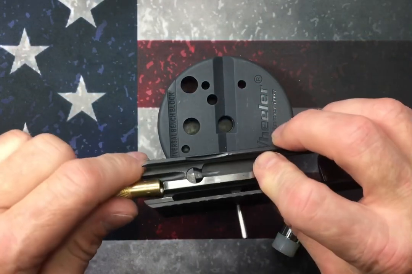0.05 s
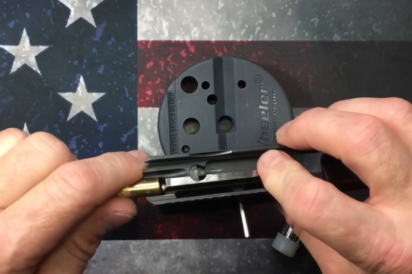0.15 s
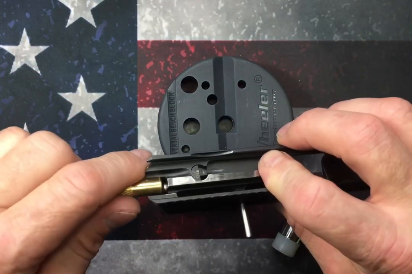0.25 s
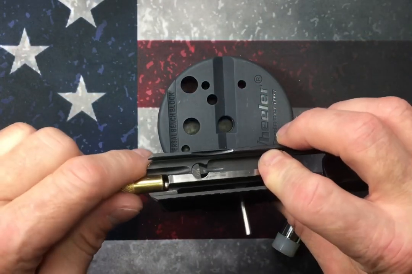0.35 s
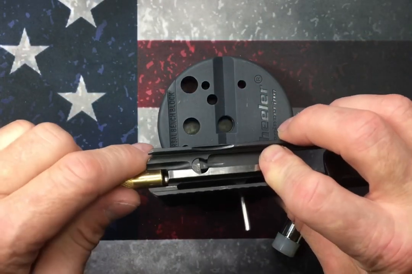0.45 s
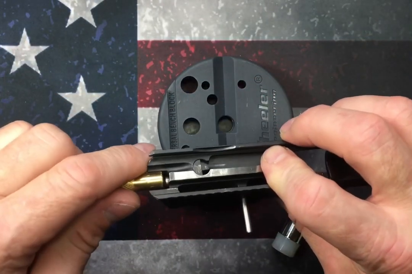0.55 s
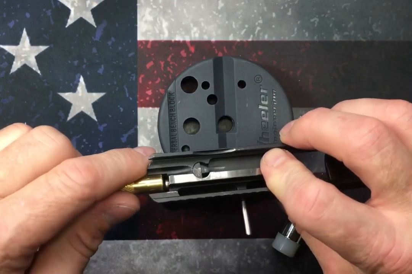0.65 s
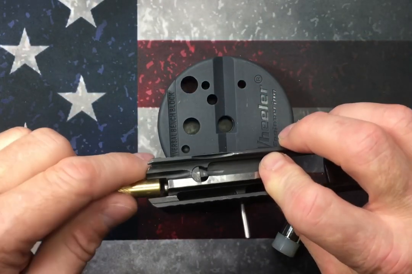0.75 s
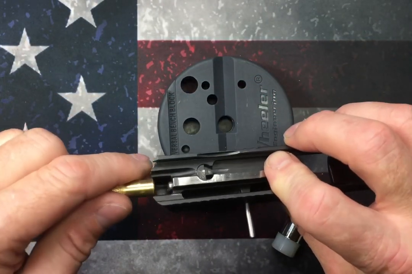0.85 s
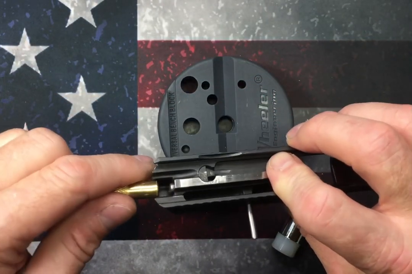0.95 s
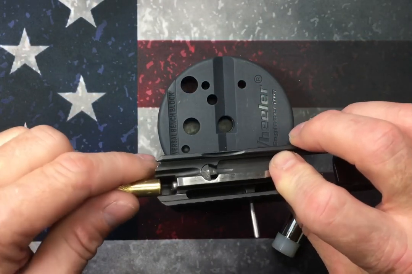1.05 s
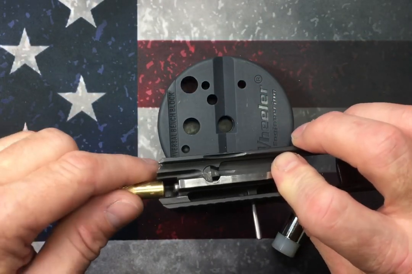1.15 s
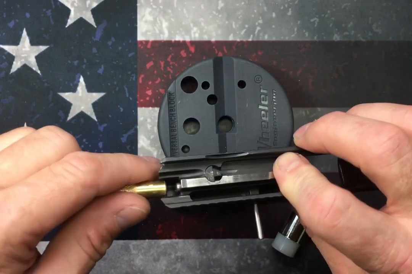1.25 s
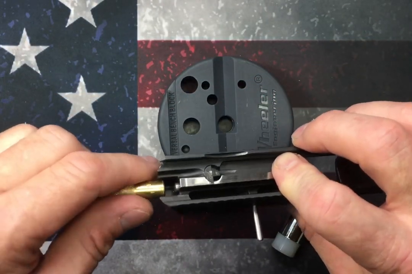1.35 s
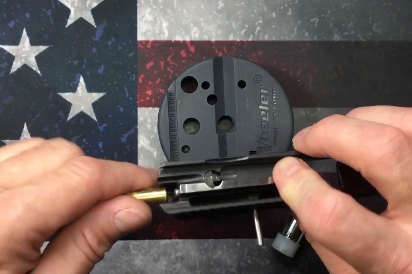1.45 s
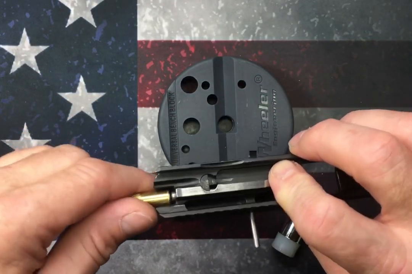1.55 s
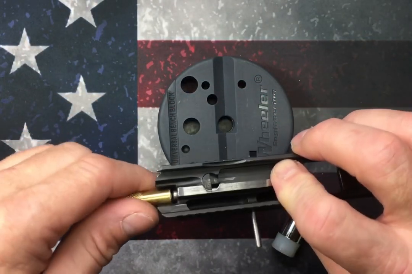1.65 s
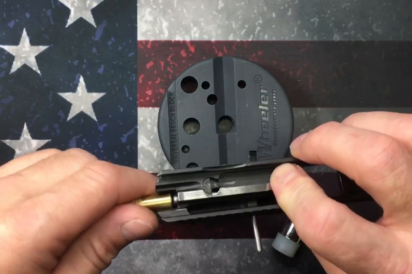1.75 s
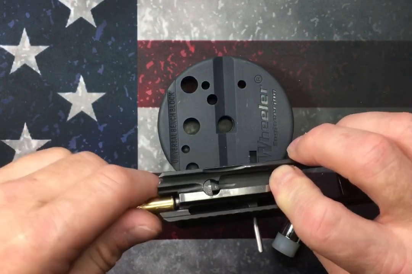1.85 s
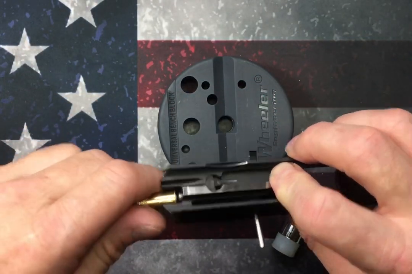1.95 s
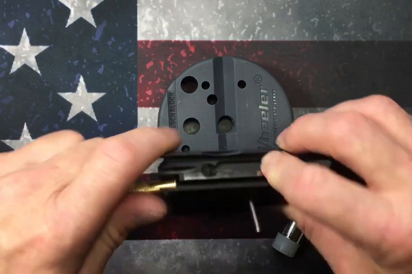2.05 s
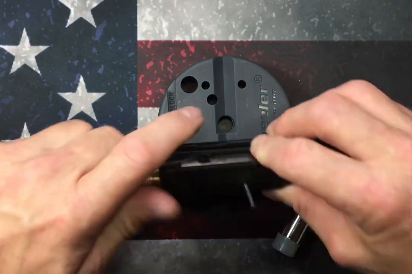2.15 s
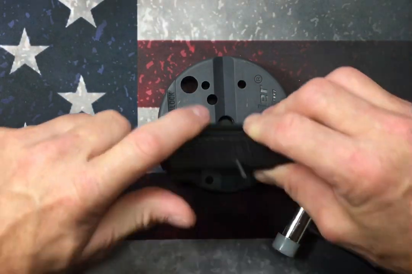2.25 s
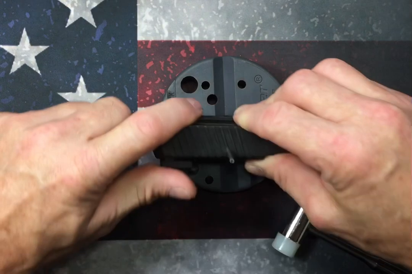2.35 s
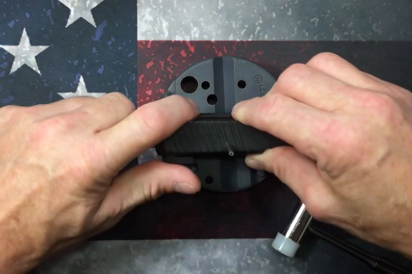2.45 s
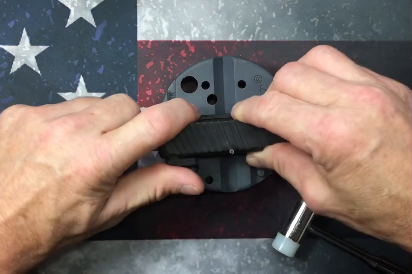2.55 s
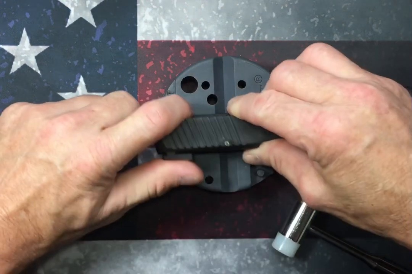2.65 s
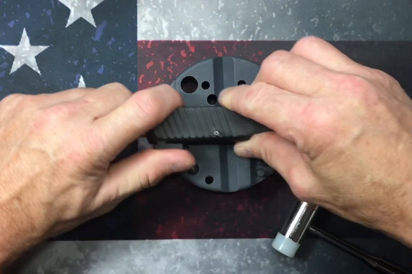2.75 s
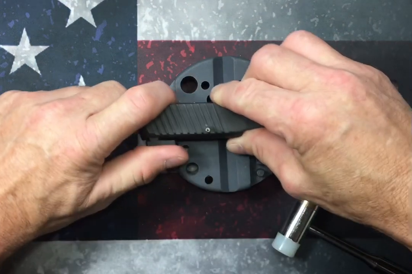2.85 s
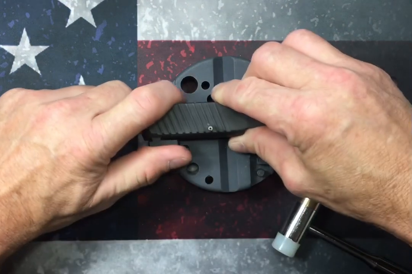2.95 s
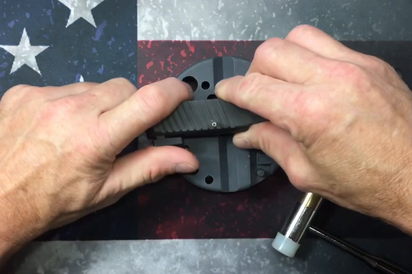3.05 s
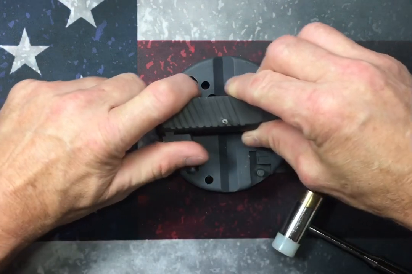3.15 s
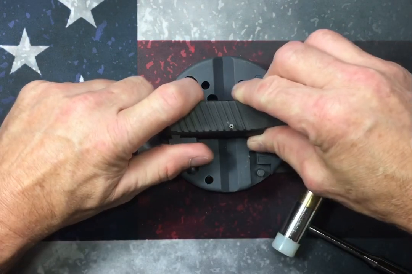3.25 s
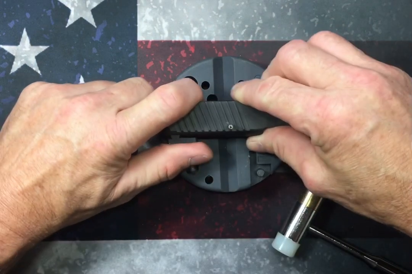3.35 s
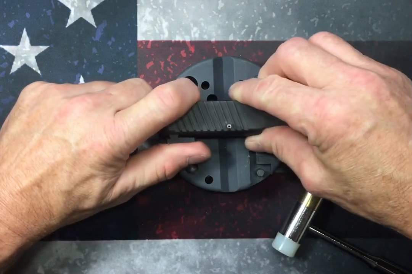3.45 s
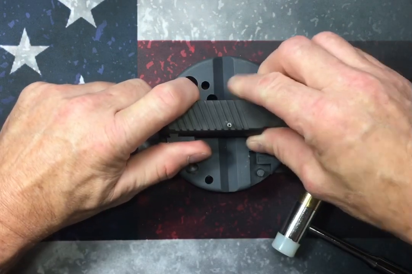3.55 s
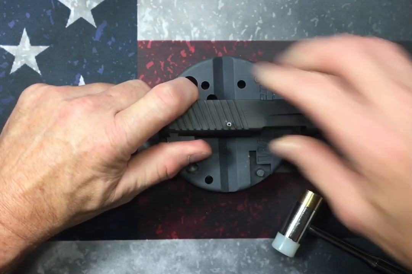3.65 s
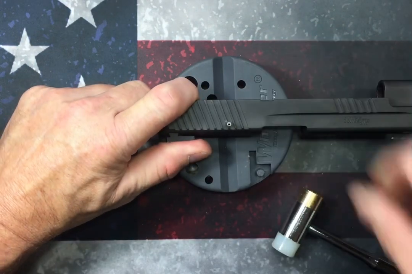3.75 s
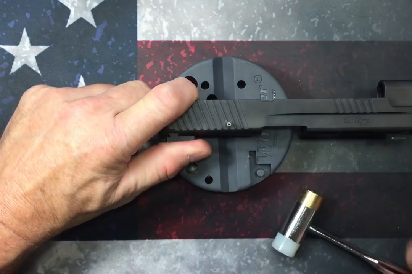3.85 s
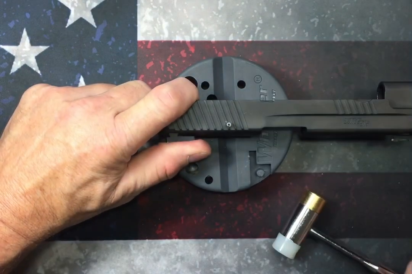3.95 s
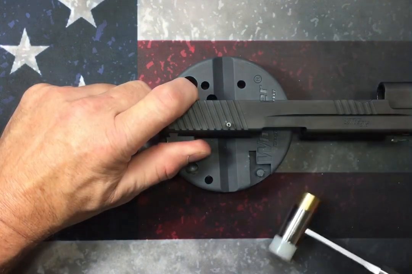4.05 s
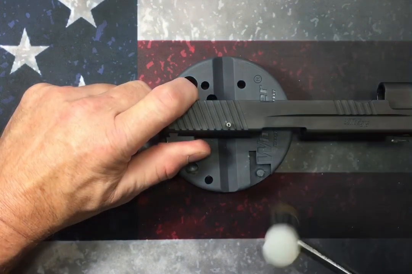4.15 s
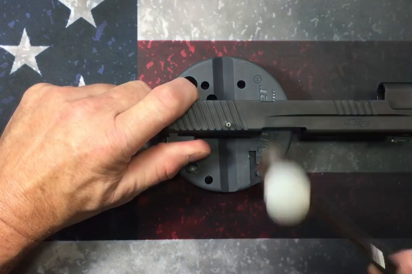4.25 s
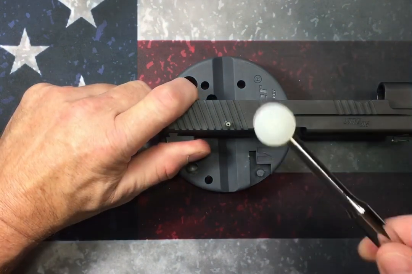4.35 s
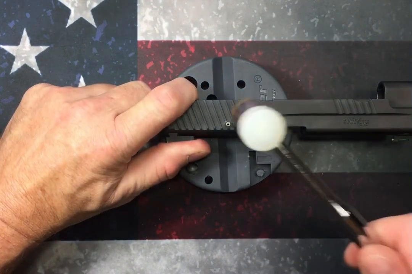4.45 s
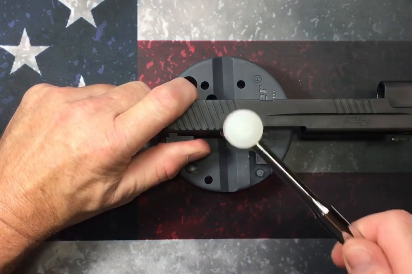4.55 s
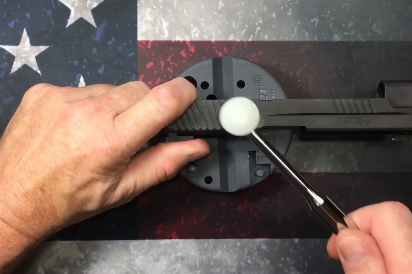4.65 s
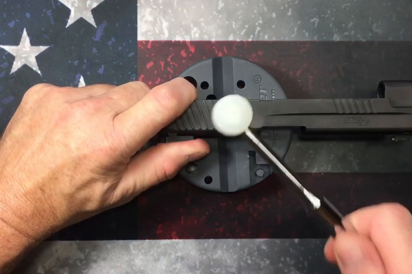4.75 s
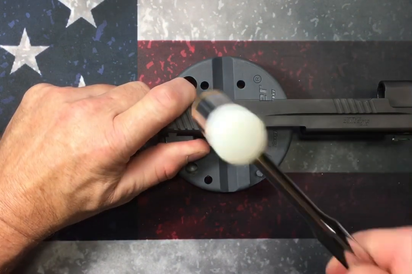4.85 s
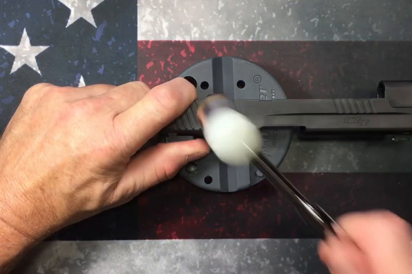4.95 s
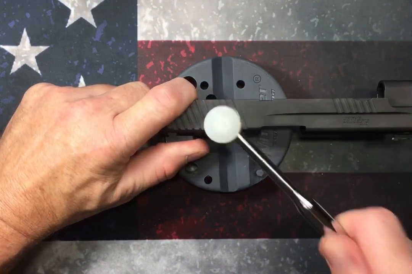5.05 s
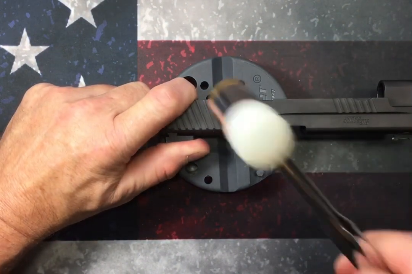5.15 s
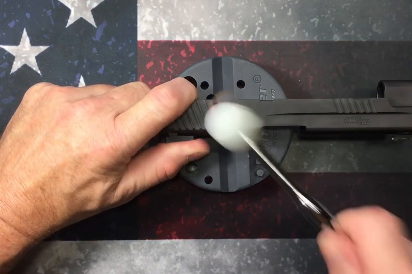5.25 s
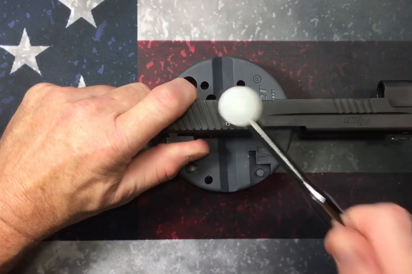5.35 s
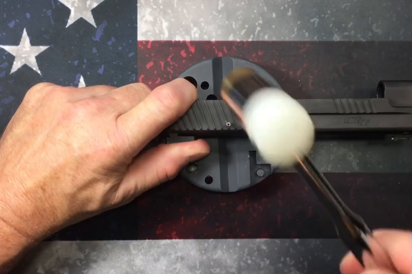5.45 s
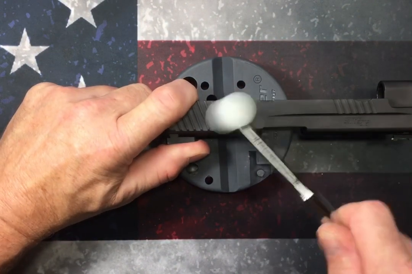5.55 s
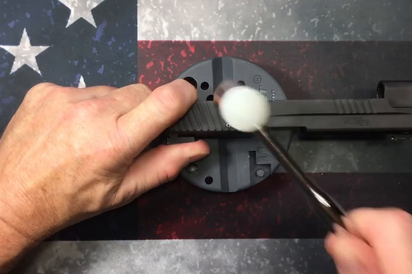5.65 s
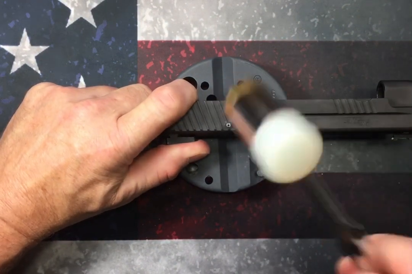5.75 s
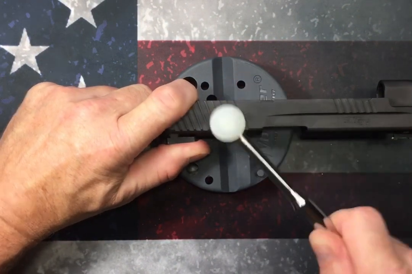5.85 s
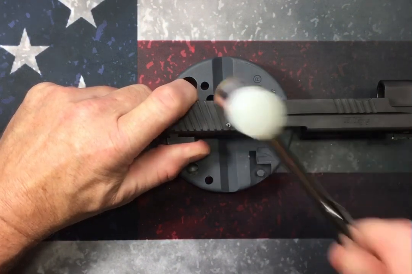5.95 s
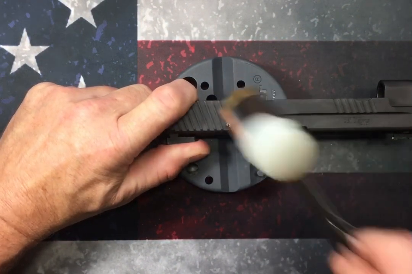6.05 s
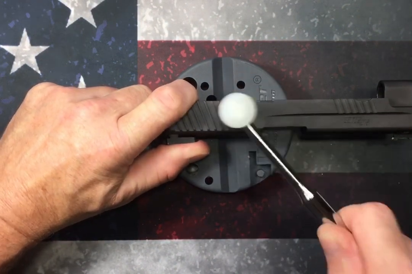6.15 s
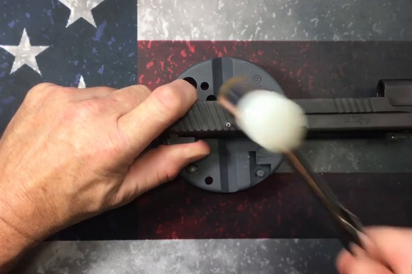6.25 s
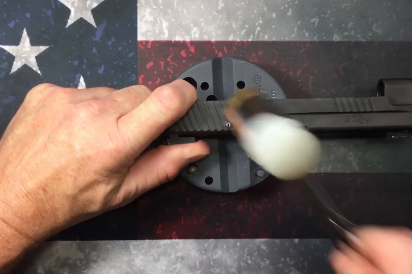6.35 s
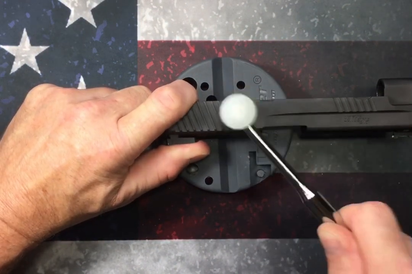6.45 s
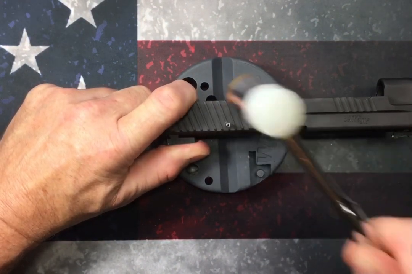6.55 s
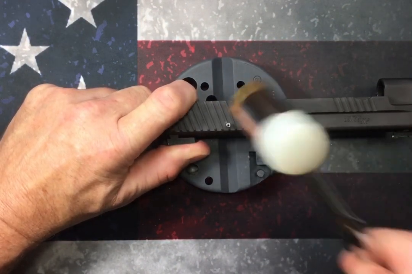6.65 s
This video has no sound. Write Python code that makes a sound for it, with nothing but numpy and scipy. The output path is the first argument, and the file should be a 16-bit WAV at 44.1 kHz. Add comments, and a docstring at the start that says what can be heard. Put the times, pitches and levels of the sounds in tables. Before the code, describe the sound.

Small metallic clicks and faint finger squeaks, a dull plastic knock, then six sharp, even hammer taps on ringing steel in a quiet room.

```python
"""A low hum and room hiss run throughout over a distant rumble; fingers click, squeak and brush a steel part.
From 1.1 s a distant motor gathers speed and levels off, its overtones swept through resonances; a whirr swells later.
The part drops into a plastic bench block (struck modes); a small hammer slides over a mat and bumps (resonant noise).
From 5.1 s six even hammer taps drive a pin: noise cracks and clatters, modes ring the steel and thump the bench.
A diffuse tail and echoes answer the near sounds; the close microphone squashes the loudest swings."""
import sys
import numpy as np
from scipy import signal
from scipy.fft import rfft, irfft
from scipy.io import wavfile

SR = 44100
rng = np.random.default_rng(int(sys.argv[2]) if len(sys.argv) > 2 else 0)


def transcribe(u):
    """Save the signal u as a 16-bit wav file named by the first command-line argument.

    u: samples, shape (n,) or (channels, n), limited to [-1, 1]; the rate is SR.
    q: integer samples, one column per channel.
    """
    v = np.clip(np.atleast_2d(u).T, -1, 1)
    q = np.round(v * 32767).astype(np.int16)
    wavfile.write(sys.argv[1], SR, q)


N = 295029

# hammer taps: (time [s], force [dB], bench sway [dB], ring [dB re RING_REF_DB], main ring pitch [Hz])
TAPS = [(5.1127, -4.5, -31, 6, 3906), (5.3954, -1.5, -20.5, 0, 3990), (5.6718, 1, -10, -4.5, 3970),
        (5.948, 3.5, -11, -4.5, 3916), (6.2260, 2, -6, -1.5, 3990), (6.5252, 3, -17.5, 1.5, 3940)]
# fixed modes of the struck steel, from 1.2 to 15.5 kHz: (frequency [Hz], relative level [dB], t60 [s])
STEEL_MODES = [(1219, -26, 0.037), (1605, -19, 0.032), (1870, -12.5, 0.013), (2103, -19, 0.02),
               (2790, -21, 0.04), (4470, -28.5, .03), (6400, -40.5, .14), (7950, -32, 0.15),
               (9450, -35, 0.1), (11400, -41.5, .1), (12080, -22.5, 0.079), (12370, -26, 0.059),
               (15500, -23.5, 0.038)]
# bending modes of the steel: (ratio to main ring [1], relative level [dB], t60 [s])
BENDING_MODES = [(.578, -11, 0.21), (.6, -0.5, 0.12), (1, 1.5, .14), (1.012, 1, 0.093)]
# bench top modes: (frequency [Hz], signed relative height [1], t60 [s])
BENCH_MODES = [(131.2, -0.55, 0.064), (165.2, 0.62, 0.058), (231, 0.066, 0.21), (277, 0.87, 0.016),
               (341.2, -0.34, 0.074), (414, -0.28, 0.053), (602.5, -0.093, 0.076), (734, 0.41, 0.018),
               (884.6, -0.075, 0.069)]
# contact crack spectrum: (frequency [Hz], relative density [dB per Hz])
CRACK_SPECTRUM = [(400, 2), (1000, 3.5), (1700, 2), (3000, 2), (4300, 0), (5500, -11.5), (8500, -6.5),
                  (12000, -3), (15500, 3.5), (17000, -23)]
# clatter of part and block, spectrum: (frequency [Hz], relative density [dB per Hz])
CLATTER_SPECTRUM = [(400, -4), (800, 4), (1150, -0.5), (1700, 1), (2300, 3.5), (3100, -3), (4200, -5),
                    (5500, -7), (10000, -8), (14500, -8.5), (17000, -23)]
# steel clicks in the hands: (time [s], body level [dB], level of the snap [dB])
CLICKS = [(.0349, -56, -55), (.1212, -36, -36), (.2355, -35.5, -47), (.3218, -60, -73), (.8675, -62, -73),
          (.9459, -57, -72), (1.5659, -38, -41), (1.6153, -45, -54), (1.6240, -48, -50), (1.6577, -48, -48),
          (2.1586, -38, -36), (2.7677, -65, -69)]
# resonances of the held part: (frequency [Hz], width [Hz], relative level [dB])
HELD_MODES = [(1670, 130, -1), (2280, 240, 2), (2650, 300, -5), (3880, 240, -3), (4800, 260, -5),
              (7200, 400, -9), (9140, 300, -13)]
# snap of steel edges, spectrum: (frequency [Hz], relative density [dB per Hz])
SNAP_SPECTRUM = [(300, -37), (1200, -16), (3500, 6), (5000, 3.5), (6400, 2), (7300, 5.5), (9300, 1),
                 (10300, -13), (15500, -30)]
# fingers squeaking on and brushing the steel: (time of peak [s], peak level [dB], frequency [Hz], width [Hz])
FINGER_RUBS = [(.215, -56, 2200, 600), (.29, -63, 2400, 200), (.952, -57, 2300, 110),
               (1.585, -56, 1950, 500), (1.625, -55, 1950, 500), (2.135, -70, 13000, 4500),
               (2.68, -69, 3900, 250)]
# part drops into its seat: (time [s], level [dB])
SEATING = [(3.386, -31.5)]
# modes of the seated block: (frequency [Hz], relative level [dB], t60 [s])
BLOCK_MODES = [(138, 3, 0.13), (327, -8, 0.056), (420, -0.5, 0.049), (553, -3.5, 0.072), (660, -2.5, 0.041),
               (1004, -16, 0.043), (1250, -10.5, 0.013), (2244, -12.5, 0.046), (2680, -19.5, 0.021)]
# hammer slides over the mat: (time [s], level [dB])
SLIDE_LEVEL = [(3.661, -79), (3.74, -79), (3.78, -64), (3.84, -66), (3.92, -75), (3.96, -81)]
# hammer resonances: (frequency [Hz], width [Hz], relative level [dB])
HAMMER_MODES = [(1034, 240, 4.5), (1205, 160, 12), (1680, 160, 13.5), (2020, 310, 9.5), (2620, 1000, -7)]
# hammer bumps as it is picked up: (time [s], level [dB])
BUMPS = [(3.966, -60.5), (3.993, -46), (4.0060, -53), (4.1512, -59.5)]
# room build-up: (frequency [Hz], rise time [s])
ROOM_RISE = [(200, .11), (400, .015), (2500, .015), (5000, .055)]
# room decay: (frequency [Hz], t60 [s])
ROOM_T60 = [(100, .5), (250, .5), (800, .38), (2300, .33), (3200, .29), (5000, .29), (9000, .265),
            (14000, .235)]
# room colour: (frequency [Hz], level re wet level [dB])
ROOM_COLOUR = [(50, -7), (110, -4.5), (160, -5), (225, 3.5), (300, 0), (400, 0), (500, 3.5), (750, 2),
               (1150, 4), (1700, -1.5), (2300, .5), (3200, 4), (6000, 1), (14000, .5)]
# wall echoes: (delay [s], level [dB])
ECHOES = [(0.03, -26), (0.0554, -19.5), (0.0866, -23.5), (.1135, -30), (.143, -36.5)]
# motor drone: (time [s], level before FIRING_DB [dB])
MOTOR_LEVEL = [(1.2, -59.5), (1.5, -55.5), (1.78, -54), (2.29, -49), (3.14, -53), (3.38, -52.5),
               (4.15, -58.5), (4.44, -51), (4.77, -64), (5.0, -71)]
# motor throb at twice the turning rate: (time [s], level [dB])
THROB_LEVEL = [(1.2, -67), (1.68, -54.5), (3.23, -62), (3.38, -53.5), (4.09, -46.5), (4.96, -77),
               (5.0, -67)]
# resonances met by the motor overtones: (frequency [Hz], width [Hz], level re firing tone [dB])
BOOMS = [(143, 6.5, -13.5), (164.5, 12.3, -2.5), (198, 10, -8.5), (257.3, 10, -18), (282.5, 7.8, -10.5),
         (313.7, 12, -21), (344, 8.5, -22.5)]
# distant rumble contour, before shift and scaling: (time [s], level [dB])
RUMBLE_CONTOUR = [(0.0, -83.5), (1.11, -82), (1.57, -73.5), (1.91, -76), (2.18, -69), (2.43, -72),
                  (2.78, -67.5), (5.05, -75.5)]
# rumble spectrum: (frequency [Hz], relative density [dB per Hz])
RUMBLE_SPECTRUM = [(60, -13), (90, 12.5), (180, -4.5), (230, -9), (320, -2), (400, -4), (600, -3.5),
                   (760, -18), (930, -10.5), (1300, -28.5), (2500, -40)]
# steady hum: (frequency [Hz], level [dB])
HUM_TONES = [(58.3, -49.5), (87.4, -62), (175, -79.5)]
# room hiss spectrum: (frequency [Hz], relative density [dB per Hz])
HISS_SPECTRUM = [(30, 5.5), (70, 21.5), (120, 10), (250, -1.5), (500, -11), (1000, -11.5), (2500, -13.5),
                 (7000, -20.5), (12000, -24.5), (16000, -26.5)]

# levels at a force of 0 dB, and their change in dB per dB of force
CRACK_DB, STRIKE_DB, TREBLE_DB = -6, 0.25, -3.07
CRACK_GROWTH, STRIKE_GROWTH, DULLING = 0.85, 0.45, 1.1
CLATTER_REL_DB, RING_REF_DB = -20, -28
THUMP_DELAY_S = 0.001966
CLICK_T60_S, RUB_SWELL_S = 0.013, 0.014
MOTOR_START_S, MOTOR_ATTACK_S, RUN_UP_S = 1.1, 0.099, 0.62
START_TURNS_PER_S, TOP_TURNS_PER_S, FIRING_DB = 31.0, 35.7, 1.5
WHIRR_PEAK_S, WHIRR_DB, WHIRR_FADE_DB_PER_S = 4.8, -55.5, 13.5
WHIRR_PEAK_HZ, WHIRR_RISE_HZ_PER_S = 308.5, 12
RUMBLE_TOP_DB, RUMBLE_SWING = -60, 1.2  # top of the contour before random drift; contour scale
DIP_S, DIP_DB, DIP_WIDTH_S = 0.935, 9, 0.025
CUTOFF_HZ = 15900


def hammer():
    """Crack, clatter and delayed thump (block gives way) follow force; ring and sway are given for each tap."""
    out = np.zeros(N)
    for s, force_db, sway_db, ring_db, ring_hz in TAPS:
        add(out, s, steel_strike(force_db))
        add(out, s, from_db(ring_db + RING_REF_DB) * bending_ring(ring_hz))
        sway = from_db(sway_db) * ring(hz=66, t60_s=0.072)  # whole bench pushed down
        add(out, s + THUMP_DELAY_S, from_db(force_db) * bench_thump() - sway)
    return out


def steel_strike(force_db):
    """Contact noise plus fixed steel modes; a firmer tap has more crack and less treble."""
    crack_db = CRACK_DB + CRACK_GROWTH * force_db
    crack = from_db(crack_db) * noise(CRACK_SPECTRUM, SR // 2) * fade(0.014)
    clatter = from_db(CLATTER_REL_DB) * noise(CLATTER_SPECTRUM, SR // 2) * fade(0.1)
    detune = rng.normal(1, 0.0012, len(STEEL_MODES))
    steel = 0
    for k, (hz, db, t60_s) in enumerate(STEEL_MODES):
        gain = from_db(db + rng.standard_normal())
        steel = steel + (-1) ** k * gain * ring(hz * detune[k], t60_s)
    strike = crack + from_db(STRIKE_DB + STRIKE_GROWTH * force_db) * (clatter + steel)
    return shelve_treble(strike, TREBLE_DB - DULLING * force_db, corner_hz=5100)


def bending_ring(main_hz):
    """Bending modes of the steel, all shifting together with the main ring."""
    return sum(from_db(db) * ring(ratio * main_hz, t60_s) for ratio, db, t60_s in BENDING_MODES)


def bench_thump():
    """Low bench modes; random strengths and shifts stand for the holding hand's pressure."""
    strength = from_db(rng.normal(0, 0.8, len(BENCH_MODES)))
    detune = rng.normal(1, 0.012, len(BENCH_MODES))
    thump = 0
    for (hz, height, t60_s), gain, shift in zip(BENCH_MODES, strength, detune):
        thump = thump + height * gain * ring(hz * shift, t60_s)
    return thump


def handling():
    """Part and hammer are moved by hand."""
    return clicks() + finger_rubs() + seating() + hammer_bumps() + hammer_slide()


def clicks():
    """Body resonances damped by the hand, plus a snap of steel edges."""
    out = np.zeros(N)
    for s, body_db, snap_db in CLICKS:
        damped = fade(CLICK_T60_S) + from_db(-11) * fade(0.097)
        body = resonant_noise(HELD_MODES, SR // 2) * damped
        snap = noise(SNAP_SPECTRUM, SR // 2) * fade(CLICK_T60_S)
        add(out, s, from_db(body_db) * body + from_db(snap_db) * snap)
    return out


def finger_rubs():
    """Squeaks and a brush of fingers: noise bands swelling as pressure builds and eases."""
    out = np.zeros(N)
    for s, db, hz, width_hz in FINGER_RUBS:
        swell = np.exp(-0.5 * (age_s() / RUB_SWELL_S - np.pi) ** 2)
        friction = resonant_noise([(hz, width_hz, 0)], SR // 2)
        add(out, s - np.pi * RUB_SWELL_S, from_db(db) * swell * friction)
    return out


def seating():
    """Dull knock: block modes excited through a soft plastic contact."""
    out = np.zeros(N)
    for s, db in SEATING:
        knock = 0
        for k, (hz, mode_db, t60_s) in enumerate(BLOCK_MODES):
            knock = knock + (-1) ** k * from_db(db + mode_db) * ring(hz, t60_s)
        add(out, s, knock * np.minimum(age_s() / 0.00072, 1))
    return out


def hammer_bumps():
    """Decaying noise through the hammer resonances."""
    out = np.zeros(N)
    for s, db in BUMPS:
        add(out, s, from_db(db) * resonant_noise(HAMMER_MODES, SR // 2) * fade(0.067))
    return out


def hammer_slide():
    """Friction through the hammer resonances; random level changes as it sticks and slips."""
    level_db, = in_time(SLIDE_LEVEL)
    start_s, end_s = SLIDE_LEVEL[0][0], SLIDE_LEVEL[-1][0]
    sliding = (clock_s() > start_s) & (clock_s() < end_s)
    return sliding * from_db(level_db + 3.7 * waver(120)) * resonant_noise(HAMMER_MODES, N)


def room(x, wet_db, echo_hz):
    """A diffuse tail that dies sooner in the treble, plus dull wall echoes."""
    edges_hz, tail = np.geomspace(40, 17000, 24), 0
    for low, high in zip(edges_hz, edges_hz[1:]):
        bandpass = signal.butter(2, [low, high], "band", fs=SR, output="sos")
        band = signal.sosfilt(bandpass, rng.standard_normal(SR))[-(SR // 2):]
        hz = np.sqrt(low * high)
        build_up = np.clip(age_s() / max(at_hz(ROOM_RISE, hz), 1e-3), 0, 1) ** 2  # reflections thicken
        shape = build_up * fade(at_hz(ROOM_T60, hz))
        power = np.mean(shape ** 2) * (high - low) / (SR / 2)  # share by bandwidth
        gain = from_db(wet_db + at_hz(ROOM_COLOUR, hz)) * np.sqrt(power)
        tail = tail + gain * rms_one(band * shape)
    out = signal.fftconvolve(x, tail)[:N]
    dull = signal.sosfilt(signal.butter(1, echo_hz, fs=SR, output="sos"), x)
    for s, db in ECHOES:
        add(out, s, from_db(db) * dull)
    return out


def background():
    """Distant machine sounds, hum and room hiss."""
    hiss = from_db(-64) * noise(HISS_SPECTRUM, N)
    return motor() + whirr() + rumble() + hum() + hiss


def motor():
    """Firing tone, low throb, and overtones that swell as speed carries them through resonances."""
    since_start_s = np.maximum(clock_s() - MOTOR_START_S, 0)
    speed_gap = (TOP_TURNS_PER_S - START_TURNS_PER_S) * np.exp(-since_start_s / RUN_UP_S)
    turns_per_s = TOP_TURNS_PER_S - speed_gap
    level_db, = in_time(MOTOR_LEVEL)
    throb_db, = in_time(THROB_LEVEL)
    overtones = 0
    for order in range(4, 11):
        hz = order * turns_per_s
        gain = sum(from_db(db) / (1 + (2 * (hz - boom_hz) / width_hz) ** 2)
                   for boom_hz, width_hz, db in BOOMS)
        overtones = overtones + gain * wavering_tone(hz, rate_hz=4)
    firing = from_db(0.8 * waver(7.4)) * tone(3 * turns_per_s)
    drone = from_db(level_db + FIRING_DB) * (firing + overtones)
    throb = from_db(throb_db) * tone(2 * turns_per_s)
    return np.minimum(since_start_s / MOTOR_ATTACK_S, 1) * (drone + throb)


def whirr():
    """A rough tone, rising slowly in pitch, swells to a peak and fades at the same rate."""
    since_peak_s = clock_s() - WHIRR_PEAK_S
    hz = WHIRR_PEAK_HZ + WHIRR_RISE_HZ_PER_S * since_peak_s
    level_db = WHIRR_DB - WHIRR_FADE_DB_PER_S * abs(since_peak_s)
    return from_db(level_db) * (from_db(-4.5) * tone(hz) + wavering_tone(hz, rate_hz=85))


def rumble():
    """Low noise following a scaled contour with slow random drift."""
    contour_db, = in_time(RUMBLE_CONTOUR)
    level_db = RUMBLE_TOP_DB + RUMBLE_SWING * (contour_db - contour_db.max())
    return from_db(level_db + 1.6 * waver(10)) * noise(RUMBLE_SPECTRUM, N)


def hum():
    """Steady low tones with one brief dip."""
    dip = np.exp(-0.5 * ((clock_s() - DIP_S) / DIP_WIDTH_S) ** 2)
    return from_db(-DIP_DB * dip) * sum(from_db(db) * tone(hz) for hz, db in HUM_TONES)


def from_db(db):
    """Decibels to gain."""
    return 10 ** (np.asarray(db) / 20)


def rms_one(x):
    """Scale to unit power."""
    return x / np.sqrt(np.mean(x ** 2) + 1e-20)


def clock_s():
    """Time of every sample."""
    return np.arange(N) / SR


def age_s():
    """Time since a blow, over half a second."""
    return np.arange(SR // 2) / SR


def in_time(rows):
    """Each column of a curve at every sample."""
    s, *columns = np.transpose(rows)
    return [np.interp(clock_s(), s, column) for column in columns]


def at_hz(points, hz):
    """Read a spectrum on a log-frequency axis."""
    point_hz, values = np.transpose(points)
    return np.interp(np.log(hz + 1e-9), np.log(point_hz), values)


def noise(spectrum, size):
    """Noise of a given colour, rms 1."""
    gain = from_db(at_hz(spectrum, np.fft.rfftfreq(size, 1 / SR)))
    return rms_one(irfft(rfft(rng.standard_normal(size)) * gain, size))


def resonant_noise(modes, size):
    """Noise through parallel resonances with steep skirts, rms 1."""
    white, out = rng.standard_normal(size), 0
    for hz, width_hz, db in modes:
        b, a = signal.iirpeak(hz, hz / (1.5 * width_hz), fs=SR)  # widened, as two passes narrow it
        once = signal.lfilter(b, a, white)
        out = out + from_db(db) * signal.lfilter(b, a, once)
    return rms_one(out)


def fade(t60_s):
    """Exponential decay from height 1."""
    return np.exp(-np.log(1000) * age_s() / max(t60_s, 1e-3))


def ring(hz, t60_s):
    """One struck mode: a decaying sine."""
    return np.sin(2 * np.pi * hz * age_s()) * fade(t60_s)


def waver(rate_hz):
    """Random movement: lines between normal knots of spread 1, rate_hz knots per second."""
    knots = rng.standard_normal(N // 100)
    return np.interp(clock_s() * rate_hz, np.arange(len(knots)), knots)


def tone(hz):
    """A sine that follows a pitch curve, rms 1."""
    return np.sqrt(2) * np.sin(2 * np.pi * np.cumsum(hz * np.ones(N)) / SR)


def wavering_tone(hz, rate_hz):
    """A tone with random amplitude and phase: two wavering quadrature parts."""
    phase = 2 * np.pi * np.cumsum(hz) / SR
    return waver(rate_hz) * np.cos(phase) + waver(rate_hz) * np.sin(phase)


def shelve_treble(x, db, corner_hz):
    """First-order shelf: raises or lowers the treble by db."""
    highpass = signal.butter(1, corner_hz, "high", fs=SR, output="sos")
    return x + (from_db(db) - 1) * signal.sosfilt(highpass, x)


def add(out, s, sound):
    """Mix a sound in at time s."""
    start = max(round(s * SR), 0)
    out[start:start + len(sound)] += sound[:N - start]


def scene():
    """Near bench sounds, their room reflections and the background."""
    near = hammer() + handling()
    reflections = room(near, wet_db=-43.5, echo_hz=500)
    return (near + reflections + background())[None]


def record(dry):
    """Microphone overload squashes the loudest swings; a steep low-pass cuts the top."""
    squashed = dry / (1 + (dry / 0.6) ** 4) ** (1 / 4)
    lowpass = signal.ellip(10, 0.2, 80, CUTOFF_HZ, fs=SR, output="sos")
    return signal.sosfilt(lowpass, squashed)


dry = scene()
out = record(dry)
transcribe(out)
```